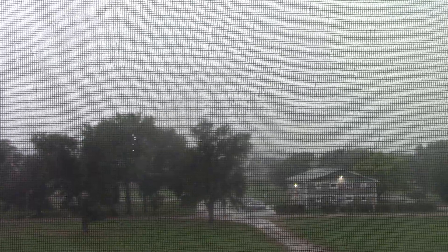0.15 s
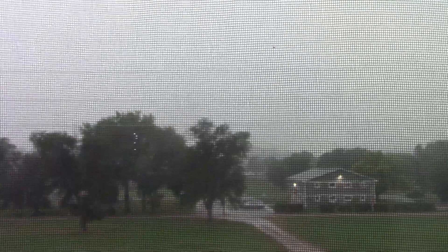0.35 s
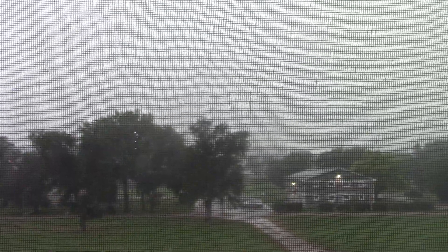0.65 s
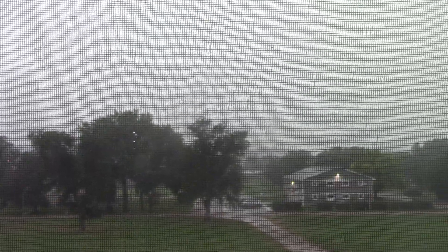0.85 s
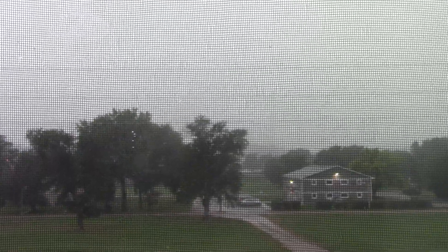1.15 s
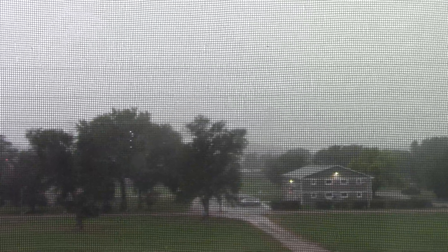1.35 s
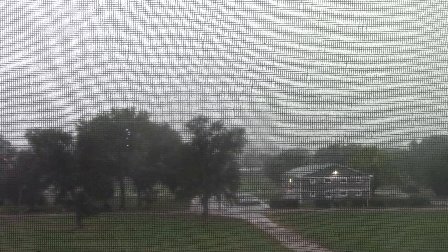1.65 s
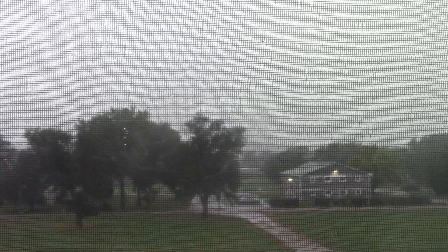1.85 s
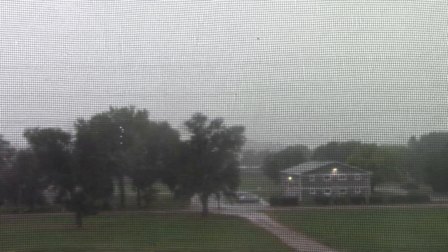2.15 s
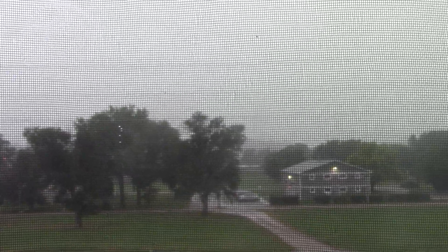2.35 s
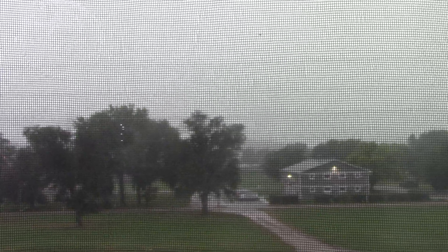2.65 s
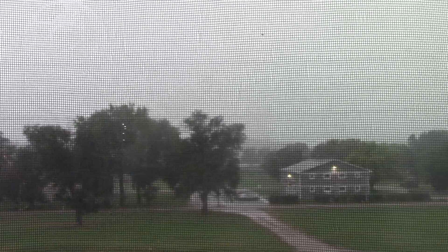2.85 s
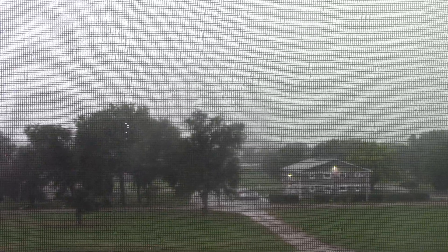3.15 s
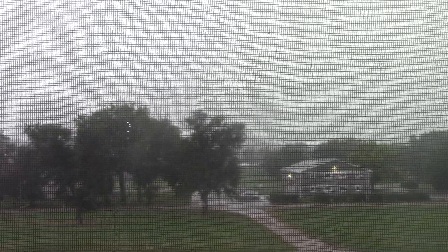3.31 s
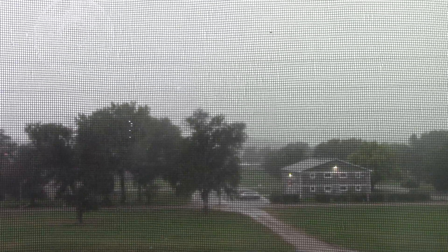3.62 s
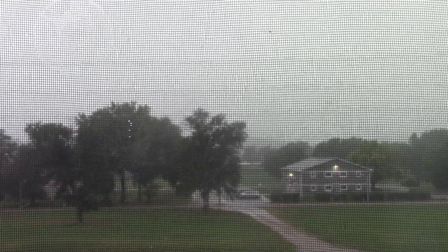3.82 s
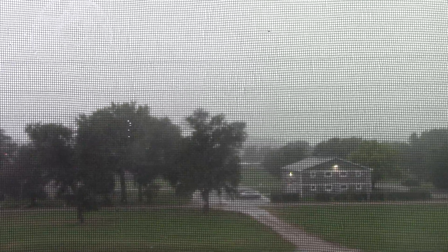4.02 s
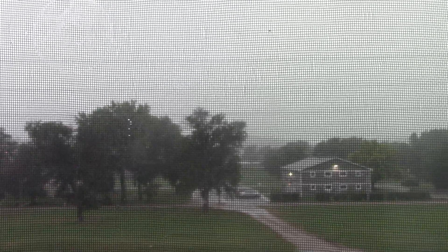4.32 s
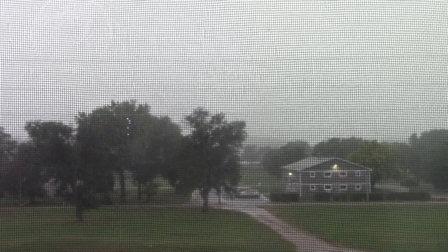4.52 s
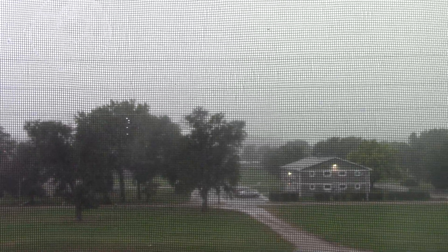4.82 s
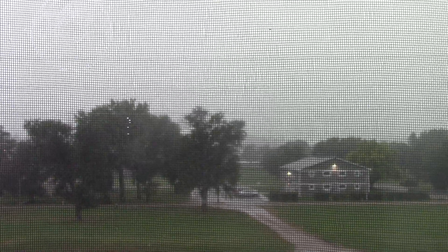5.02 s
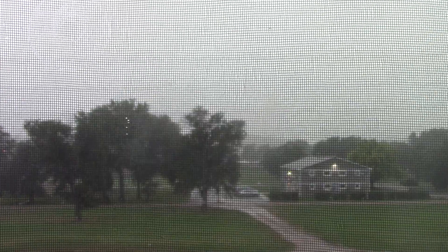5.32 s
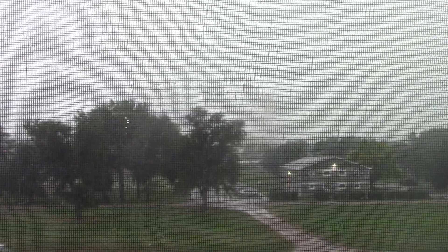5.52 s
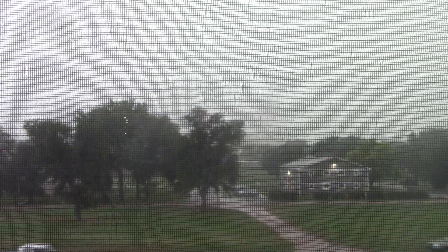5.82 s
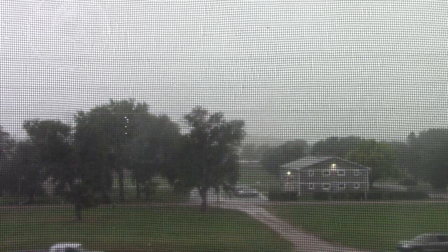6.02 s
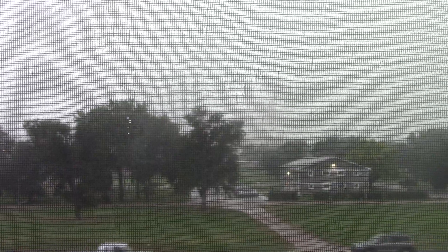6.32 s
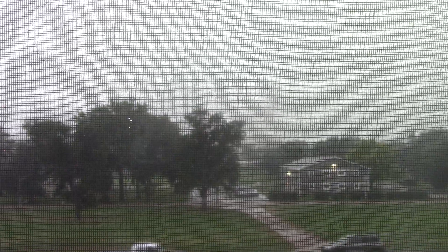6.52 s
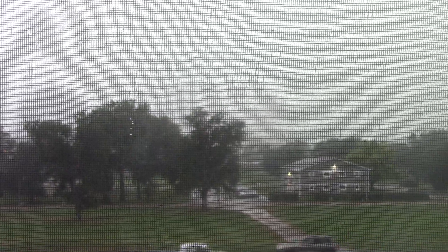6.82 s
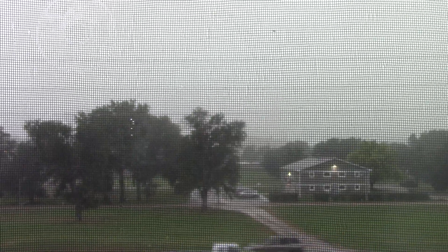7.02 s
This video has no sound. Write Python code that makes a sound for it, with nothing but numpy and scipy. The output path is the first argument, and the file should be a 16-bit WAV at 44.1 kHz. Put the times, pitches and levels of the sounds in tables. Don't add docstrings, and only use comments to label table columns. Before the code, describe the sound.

Inside a room at an open screened window, steady rain hisses over lawns and roofs with small drops pattering on the sill. Low thunder rolls, peaking a little after two seconds, then ebbs while cars swish by on the wet road. Near six seconds a far stronger peal booms with bunched claps, and it is still rolling at the end. Small stereo microphones stand just inside.

```python
import sys
import numpy as np
from scipy import signal
from scipy.fft import rfft, irfft, next_fast_len
from scipy.io import wavfile
from scipy.ndimage import uniform_filter1d, map_coordinates

SR = 44100
rng = np.random.default_rng(int(sys.argv[2]) if len(sys.argv) > 2 else 0)


def dump(signal):
    limited = np.clip(np.atleast_2d(signal).T, -1, 1)
    pcm = np.round(limited * 32767).astype(np.int16)
    wavfile.write(sys.argv[1], SR, pcm)


def to_linear_factor(level_db):
    exponent = np.asarray(level_db, float) / 20
    return 10 ** exponent


N = 315756


def unit(x):
    return x / np.sqrt(np.mean(x ** 2) + 1e-20)


def along(points, hz):
    f, v = np.transpose(points)
    return np.interp(np.log(hz + 1), np.log(f + 1), v)


def curves(rows):
    s, *cols = np.transpose(rows)
    return np.array([np.interp(np.arange(N) / SR, s, c) for c in cols])


def wobble(rate):
    knots = rng.standard_normal(int(N * rate / SR) + 4)
    return map_coordinates(knots, [np.arange(N) * rate / SR])


def filtered(x, response):
    m = next_fast_len(N + SR)
    return irfft(rfft(x, m) * response(np.fft.rfftfreq(m, 1 / SR)), m)[..., :N]


def resonance(f, hz, width):
    return 1j * f * width / (hz * hz - f * f + 1j * f * width)


def rush(spectrum, patchy_db):
    z = signal.stft(rng.standard_normal(N), nperseg=512)[2]
    field = uniform_filter1d(rng.standard_normal(z.shape), 6, 0)
    field = unit(uniform_filter1d(field, 14, 1))
    noise = signal.istft(z * to_linear_factor(patchy_db * field), nperseg=512)[1][:N]
    return unit(filtered(noise, lambda f: to_linear_factor(along(spectrum, f))))


ROLL_EDGES_HZ = [108.5, 141, 218, 311, 508]
# start_s, level_db
FAR_STROKE = [(0, -62.5), (.6, -57), (1.0, -55), (1.3, -47), (2.05, -46.5), (2.35, -39), (2.75, -45),
              (3.0, -46.5), (3.7, -52), (4.45, -51.5), (5.4, -49.5), (7.16, -68)]
# start_s, level_db
NEAR_STROKE = [
    (3.7, -61),
    (4.75, -46.5),
    (5.25, -50.5),
    (5.5, -39),
    (5.7, -31.5),
    (6.3, -36),
    (6.55, -36.5),
    (6.95, -35.5),
    (7.16, -31),
]
FAR_VOICE = [-4, -1.5, 2, -3, -3, -8]
NEAR_VOICE = [-6.5, -1.5, 2, -6, -8, -18]
# centre_s, depth_db, pitch_hz, half_length_s
LULLS = [(.3, -17, 700, .05), (.33, -8, 250, .02), (.49, -10, 180, .03), (1.01, -10, 125, .04),
         (1.11, -6, 75, 0.09), (1.43, -7, 220, 0.049), (1.44, -8, 75, .08), (1.54, -14, 270, .03),
         (1.93, -2, 75, .06), (2.09, -25, 273, 0.057), (2.31, -8, 180, 0.012), (2.34, -12, 270, .03),
         (2.86, -7, 75, 0.087), (3.31, -1, 756, .05), (3.36, -9, 125, 0.027), (4.16, -11, 125, 0.045),
         (4.43, -3, 400, 0.035), (4.57, -17, 125, 0.049), (4.58, -6, 75, 0.071), (4.9, -1, 400, 0.044),
         (4.93, -29, 270, 0.041), (4.95, -15, 124, 0.062), (5.1, -14, 270, .03), (5.3, -1, 200, .04),
         (5.41, -12, 75, .1), (5.535, -9, 125, 0.027), (5.59, -2.5, 270, 0.039), (5.52, -5.5, 400, 0.043),
         (5.63, -3.5, 500, 0.06), (5.76, -3, 400, 0.024), (5.915, -2, 160, .015), (6.03, -2, 160, 0.021),
         (6.19, -3, 200, .02), (6.46, -7, 192.7, .02), (6.2, -13, 101, 0.043), (6.43, -2, 75, .07),
         (6.57, -16, 135, 0.031), (6.66, -13, 125, 0.035), (6.75, -2, 270, 0.046), (6.8, -1, 760, 0.039),
         (6.83, -9, 150, .03), (5.99, -4.5, 790, .02), (6.95, -10, 125, .03), (6.98, -2, 251, 0.015)]


def roll():
    kin = [0, 0, 1, 2, 2, 3]
    fronts = rng.standard_normal((4, N))[kin] * to_linear_factor(1.4 * wobble(35))
    turns = np.c_[[1j, 1, 1, 1j, 1, 1]]

    def parts(f):
        above = [1 / (1 + (hz / (f + 1)) ** 16) for hz in ROLL_EDGES_HZ]
        above = [np.ones_like(f)] + above + [0 * f]
        return np.sqrt(np.abs(np.diff(above, axis=0)))

    rings = filtered(fronts, lambda f: parts(f) * turns * room(f))
    power = uniform_filter1d(uniform_filter1d(rings ** 2, size=2600), size=2600)
    strokes = (to_linear_factor(curves(FAR_STROKE)) * to_linear_factor(np.c_[FAR_VOICE])) ** 2
    strokes = strokes + (to_linear_factor(curves(NEAR_STROKE)) * to_linear_factor(np.c_[NEAR_VOICE])) ** 2
    surge_db = 0.9 * np.array([wobble(8.3) for _ in range(4)])
    surges = to_linear_factor(surge_db)[kin] ** 2
    gaps = to_linear_factor(bumps(LULLS, lambda db: db, lambda hz: close(hz, octaves=0.31)))
    strength = np.sqrt((strokes * surges + echoes()) / (np.abs(power) + 1e-12))
    return np.sum(gaps * rings * strength, axis=0)


# start_s, peak_db, pitch_hz
FAR_CLAPS = [(0.194, -33.5, 158), (0.23, -37, 146), (0.251, -48, 169), (0.347, -58, 376), (.375, -44, 181),
             (0.499, -42, 377), (0.632, -41, 150), (0.824, -47, 195), (0.86, -54, 140), (1.081, -44.5, 377),
             (1.331, -33, 141), (1.356, -50, 170), (1.488, -29.5, 180), (1.62, -44, 358), (1.751, -49, 401),
             (1.911, -31, 136), (2.261, -20.5, 172), (2.286, -24, 149), (2.358, -32, 135),
             (2.375, -37, 348), (2.53, -33, 412), (2.55, -29, 183), (2.677, -31, 134), (3.198, -30.5, 208),
             (3.431, -56, 136), (3.472, -31, 133), (3.827, -34, 182), (3.9, -32.5, 183), (4.041, -35, 177),
             (4.362, -52, 137), (4.529, -38.5, 387)]
NEAR_CLAPS = [(5.39, -29, 208), (5.544, -23.5, 185), (5.568, -22, 194), (5.627, -16.5, 200),
              (5.693, -26.5, 274.5), (5.72, -22.5, 267), (5.811, -6, 184), (5.834, -18, 175),
              (5.857, -12, 176), (5.926, -21, 277), (5.966, -27, 412), (6.044, -10.5, 201.5),
              (6.052, -30, 412), (6.072, -16.5, 200), (6.101, -12.5, 176), (6.16, -23, 274),
              (6.2, -26, 255), (6.282, -17.5, 151), (6.302, -30, 150), (6.567, -20.5, 282),
              (6.586, -29, 243), (6.752, -41, 705), (6.86, -11, 176), (6.887, -15, 177), (6.908, -26, 178),
              (7.021, -23.5, 289), (7.034, -17.5, 221), (7.061, -21.5, 141), (7.094, -27, 444),
              (7.125, -22, 135)]


def claps():
    push, t = np.zeros(N + SR), np.arange(SR // 5) / SR
    for s, db, hz in FAR_CLAPS + NEAR_CLAPS:
        length_ms = 11.2 * (hz / 200) ** 0.89
        u = 1000 * t / length_ms
        envelope = np.e * u * np.exp(-u * (1 + u) / 2) / 2
        push[round(s * SR):][:len(t)] += to_linear_factor(db) * envelope * np.sin(2 * np.pi * hz * t)

    def direct(f):
        ratio = 112 / (f + 1)
        return 0.8 / (1 - ratio ** 2 - 1.2j * ratio) ** 2

    return filtered(push[:N], lambda f: direct(f) + 2.99 * room(f))


# peak_s, level_db, pitch_hz,
# half_length_s
SWELLS = [(0.223, -54, 276, 0.018), (0.5, -48, 363, 0.024), (0.586, -58, 760, 0.092),
          (0.667, -45.5, 140, 0.035), (.83, -54, 760, 0.065), (.88, -45.5, 151, 0.066),
          (1.262, -53.5, 760, 0.2), (1.7, -53, 300, 0.08), (1.928, -43, 125, 0.062), (2.267, -39, 162, .05),
          (2.386, -35, 126, 0.044), (2.38, -68, 760, 0.11), (2.523, -43, 370, 0.11),
          (2.94, -45, 198, 0.073), (3.222, -44.5, 314, 0.036), (1.324, -43, 135, 0.032),
          (3.456, -40, 134, 0.036), (4.37, -38.5, 125, 0.027), (5.625, -39.5, 193, 0.094),
          (4.793, -44, 183, 0.14), (4.973, -51.5, 760, 0.039), (5.11, -38.5, 174, 0.038),
          (5.75, -48.5, 760, 0.029), (5.843, -27, 128, 0.054), (.12, -54.5, 310, 0.024),
          (.69, -50, 110, .03), (2.24, -39, 125, .03), (2.45, -54, 700, .04), (2.94, -40, 125, 0.033),
          (3.5, -51, 125, .025), (3.63, -47, 125, 0.034), (3.69, -56.5, 700, 0.023), (4.04, -50, 180, .025),
          (4.86, -50, 125, .025), (6.86, -39, 270, 0.021), (7.04, -27, 125, 0.019),
          (7.13, -48.5, 850, 0.041), (5.7, -40, 75, .1), (5.87, -30, 75, 0.052), (5.995, -43, 760, 0.048),
          (6.23, -45.5, 760, 0.14), (6.294, -31.5, 123, 0.12), (6.354, -36.5, 332, 0.08),
          (6.763, -32.5, 156, 0.016), (7.064, -53, 760, 0.031),
          (0.384, -49, 125, .03), (0.37, -54, 700, 0.022), (0.634, -50, 270, 0.017),
                (0.85, -52, 318, 0.062), (1.35, -45, 400, 0.024), (1.403, -53, 760, 0.0092),
                (1.62, -47, 75, .05), (1.677, -49, 161, 0.055), (1.65, -56, 760, 0.047),
                (1.75, -55, 75, 0.044), (1.743, -52, 760, 0.02), (1.89, -53.5, 760, .04),
                (2.013, -56, 400, 0.025), (2.172, -58, 75, 0.046), (2.4, -54, 720, 0.2),
                (2.662, -35, 190, 0.012), (2.685, -57, 75, .05), (2.986, -46, 340, 0.031),
                (3.21, -50, 75, 0.065), (3.7, -46, 125, 0.028), (3.69, -52, 400, 0.034),
                (3.86, -44.5, 109, 0.047), (3.972, -47, 125, 0.027), (4.024, -50, 270, 0.02),
                (4.248, -44.5, 196, 0.027), (4.26, -48, 330, 0.031), (4.67, -43, 125, 0.022),
                (4.743, -57, 760, 0.035), (4.842, -47.5, 270, .03), (4.944, -40.5, 184, 0.056),
                (5.07, -60, 75, .05), (5.27, -43, 125, 0.036), (5.35, -47, 400, 0.034),
                (5.43, -42, 125, .025), (5.494, -46, 268, 0.027), (5.735, -32.5, 186, 0.034),
                (5.93, -39.5, 412, 0.028), (6.14, -32, 125, 0.037), (6.268, -34, 270, 0.015),
                (6.576, -53, 850, 0.056), (6.898, -37.5, 396, 0.033), (6.94, -45, 75, 0.065),
                (7.013, -43, 125, .03), (7.04, -50, 760, 0.009)]


def echoes():
    power, t = np.zeros((len(ROLL_CENTRES_HZ), N + SR)), np.arange(SR // 2) / SR
    echo_db, t60_s, octaves = -12, 0.26, 0.38

    def share(hz):
        return close(hz, octaves) / np.sum(close(hz, octaves))

    for s, db, hz in FAR_CLAPS + NEAR_CLAPS:
        tail = to_linear_factor(db + echo_db - 60 * t / t60_s) ** 2 * (1 - np.exp(-t / 0.0089))
        power[:, round(s * SR):][:, :len(t)] += np.outer(share(hz), tail)
    return power[:, :N] + bumps(SWELLS, lambda db: to_linear_factor(db) ** 2, share)


def bumps(rows, strength, reach):
    out, clock = np.zeros((len(ROLL_CENTRES_HZ), N)), np.arange(N) / SR
    front = 0.92
    for s, db, hz, half in rows:
        near = slice(max(0, int((s - 4 * half) * SR)), int((s + 4 * half) * SR))
        late = clock[near] - s
        u = late / (half * np.where(late < 0, front, 2 - front))
        out[:, near] += np.outer(reach(hz) * strength(db), np.exp(-u ** 2))
    return out


ROLL_CENTRES_HZ = [75, 125, 180, 270, 400, 760]


def close(hz, octaves):
    return np.exp(-(np.log2(hz / np.array(ROLL_CENTRES_HZ)) / octaves) ** 2)


# peak_s, level_db, pitch_hz, half_length_s
SINGING = [(0.05, -68, 1000, 0.021), (0.249, -43.5, 172, 0.019), (1.182, -50.5, 710, 0.052),
           (1.262, -52, 780, 0.022), (1.312, -54, 888, 0.02), (1.412, -54, 795, 0.02),
           (1.606, -51, 750, 0.022), (1.631, -46.5, 445, 0.026), (1.676, -53, 760, 0.022),
           (1.741, -54, 807, 0.024), (1.766, -50, 431, 0.022), (1.861, -57, 549, 0.027),
           (1.921, -49, 377, 0.024), (1.936, -54, 426, 0.106), (2.205, -46, 705, 0.032),
           (2.38, -43.5, 711, 0.04), (2.38, -36.5, 359, 0.044), (2.819, -47, 436, 0.022),
           (2.928, -46, 371, 0.062), (3.123, -44, 425, 0.024), (3.228, -50, 415, 0.026),
           (3.482, -41, 127, 0.046), (3.682, -59, 700, 0.026), (3.851, -48, 394, 0.031),
           (4.37, -51.5, 514, 0.022), (4.734, -52, 705, 0.045), (4.744, -53, 553, 0.026),
           (4.784, -44.5, 360, 0.022), (4.834, -52, 867, 0.026), (4.979, -51, 880, 0.026),
           (5.128, -46.5, 377, 0.039), (5.428, -36, 145, 0.036), (5.572, -25, 186, 0.028),
           (6.071, -31, 423, 0.027), (6.246, -47, 776, 0.036), (6.296, -28.5, 176, 0.02),
           (6.356, -38, 370, 0.02), (6.595, -38.5, 414.8, 0.066), (6.765, -39, 415, 0.026),
           (6.775, -32, 177, 0.04), (6.914, -36.5, 382, 0.018), (7.099, -38, 467, 0.032)]


def singing():
    out, waver = np.zeros(N + SR), 1.17 * wobble(18)
    for s, db, hz, half in SINGING:
        t = np.arange(-2 * half, 3 * half, 1 / SR)
        start = max(0, round((s + t[0]) * SR))
        swell = np.exp(-(t / (half * np.where(t < 0, .85, 1.15))) ** 2)
        phase = 2 * np.pi * hz * t + np.resize(waver[start:], len(t))
        out[start:][:len(t)] += to_linear_factor(db) * swell * np.sin(phase)
    return out[:N]


# pitch_hz, width_hz, level_db
ROOM_MODES = [(72, 24, -43.5), (90, 27, -29), (121.4, 9.8, -9.5), (134.7, 15, -0.5), (176, 12.3, -2),
              (211.5, 11, -6.5), (249.7, 48, -9.5), (291.6, 16, -10), (352.4, 10.2, -5), (377, 15.7, -4),
              (412, 7.1, -1.5), (444, 33, -20), (529, 25, -18), (561, 9.1, -16), (648, 20, -19),
              (705, 14, -11.5), (720, 65, -19), (785, 36, -12), (873, 30, -16), (899, 28, -17.5),
              (980, 27, -34)]
# pitch_hz, level_db
DIFFUSE = [(25, -51), (40, -39), (51, -45), (63, -31), (104, -34), (125, -26), (300, -18), (480, -25),
           (620, -29), (800, -23), (1200, -36), (2000, -56), (4000, -110)]


def room(f):
    modes = sum(to_linear_factor(db) * resonance(f, hz, width) for hz, width, db in ROOM_MODES)
    modes = modes + to_linear_factor(along(DIFFUSE, f))
    modes = modes * (1 - 1.0 * resonance(f, 47, 10)) * (1 - 0.64 * resonance(f, 101.5, 22))
    return modes / (1 - (f / 1000) ** 2 + 1.3j * f / 1000) ** 3


# pitch_hz, width_hz, gain_db
BAY = [(1500, 85, 2), (1750, 57, -0.5), (2170, 60, 1.5), (2280, 113, 4), (3760, 120, 1.5), (4350, 210, 0.5)]


def outdoors():
    def bay(f):
        return 1 + sum((to_linear_factor(db) - 1) * resonance(f, hz, width) for hz, width, db in BAY)

    return filtered(rain() + drops() + filtered(tyre_spray(), flutter), bay)


# pitch_hz, density_db_per_hz
RAIN = [(650, -25), (1100, 0.5), (1400, -5), (1480, -4), (1960, -6), (2140, -5), (2310, -16.5),
        (2760, -7.5), (3190, -10.5), (3410, -14.5), (4350, -13), (5800, -14.5), (14200, -27.5),
        (15900, -34)]
# pitch_hz, density_db_per_hz
ROOF = [(25, -31), (53, -32), (90, -3.5), (144, -4), (333, -10.5), (393, -7), (658, -16), (889, -11.5),
        (1300, -32), (1690, -55), (2860, -120)]


def rain():
    rain_db = -63 + 0.2842 * np.arange(N) / SR
    hiss = to_linear_factor(rain_db + 0.3 * wobble(2.6)) * rush(RAIN, patchy_db=0.6)
    return hiss + to_linear_factor(-55 + 1.8 * wobble(5.05)) * rush(ROOF, patchy_db=1.0)


# pitch_hz, density_db_per_hz
FAR_SPRAY = [(700, -14), (1100, -15.5), (1500, 1.5), (2300, 0.5), (2700, -4.5), (3600, -4), (4500, -6),
             (6000, -14.5), (8000, -34.5), (12000, -102)]
# pitch_hz, density_db_per_hz
NEAR_SPRAY = [(3000, -31), (3500, 0), (3700, 2), (3950, -10), (4200, -14), (4450, 6), (4700, -20),
              (5300, -21), (7000, -50)]


def tyre_spray():
    far, near = passing()
    spray = far * to_linear_factor(.9 * wobble(14)) * rush(FAR_SPRAY, patchy_db=.7)
    return spray + near * to_linear_factor(.8 * wobble(7)) * rush(NEAR_SPRAY, patchy_db=1.6)


# closest_s, far_spray_db, near_spray_db, passing_time_s
CARS = [
    (-2.5, -67, -100, 2.2),
    (3.5, -63.5, -86, 1.11),
    (5.5, -62, -80, 0.9),
    (7.5, -65.5, -71.5, 1.4),
]


def passing():
    t, power = np.arange(N) / SR, np.zeros((2, N))
    for s, far_db, near_db, span in CARS:
        power += np.outer(to_linear_factor([far_db, near_db]) ** 2, 1 / (1 + ((t - s) / span) ** 2))
    return np.sqrt(power)


# round_trip_ms, share_returned
FLUTTER = [(24.0, 0.23), (17.34, 0.45), (9.21, 0.17)]


def flutter(f):
    comb = 1
    for ms, share in FLUTTER:
        back = share / (1 + (f / 4000) ** 2)
        comb = comb / (1 - back * np.exp(-2j * np.pi * f * ms / 1000))
    return comb


# start_s, peak_db, pitch_hz, t60_s
DROPS = [(.195, -49, 2780, 0.032), (.195, -50, 1590, 0.034), (.197, -56.5, 3460, 0.038),
         (.303, -52, 2800, 0.034), (0.641, -54, 1500, 0.1), (0.702, -51, 2760, .04),
         (0.766, -50, 3930, 0.036), (0.766, -53, 3200, 0.034), (.809, -53, 4500, 0.027),
         (.869, -58, 4700, .03), (.931, -56, 4150, 0.033), (1.911, -48, 1440, 0.053),
         (3.678, -48, 2000, 0.034), (3.94, -55, 2110, .03), (3.958, -49, 4340, .04), (5.43, -58, 2280, 0.1),
         (5.505, -47, 2100, .03), (5.545, -47, 3700, 0.03), (5.54, -50, 2980, 0.036),
         (6.31, -42, 1890, 0.037), (6.513, -44, 3650, 0.021), (6.513, -56, 4740, 0.025)]


def drops():
    out, t = np.zeros(N + SR), np.arange(SR // 5) / SR
    for s, db, hz, t60 in DROPS:
        waver = 2.8 * np.cumsum(rng.standard_normal(len(t))) / np.sqrt(SR / 100)
        noise = uniform_filter1d(uniform_filter1d(rng.standard_normal(len(t)), size=5), size=4)
        splash = .4 * to_linear_factor(-60 * t / 0.029) * noise
        ring = to_linear_factor(-60 * t / t60) * np.sin(2 * np.pi * hz * t + waver)
        out[round(s * SR):][:len(t)] += to_linear_factor(db + 1.0) * (1 - np.exp(-t / 0.0034)) * (ring + splash)
    return filtered(out[:N], lambda f: 1 / (1 + (f / 5500) ** 8))


# start_s, peak_db
KNOCK = (.817, -50)
# pitch_hz, level_db, t60_s
FRAME = [(1265, 3.5, 0.092), (1500, -6, .06), (1845, 2, 0.065), (2132, -1, .11), (2370, -8, .07),
         (2820, -7, .06), (3090, -6, .07), (3650, -11, .07)]


def knock():
    out, t = np.zeros(N), np.arange(SR // 5) / SR
    start_s, peak_db = KNOCK
    ring = sum(to_linear_factor(db - 60 * t / t60) * np.sin(2 * np.pi * hz * t) for hz, db, t60 in FRAME)
    band = signal.butter(2, [2200 / SR, 7000 / SR], "band")
    ring += 1.5 * to_linear_factor(-60 * t / .09) * signal.lfilter(*band, rng.standard_normal(len(t)))
    out[round(start_s * SR):][:len(t)] = to_linear_factor(peak_db) * (1 - np.exp(-t / 0.003)) * ring
    return out


# pitch_hz, density_db_per_hz
PATTER = [(600, -40), (1100, 3.5), (2200, -2), (4400, -7), (6500, -16), (9000, -59)]


def patter():
    per_s, level_db, spread_db, decay_ms = 70, -71.5, 4.5, 7
    sizes = to_linear_factor(spread_db * np.minimum(rng.exponential(size=N), 2))
    hits = uniform_filter1d((rng.random(N) < per_s / SR) * sizes, size=90)
    splashes = signal.lfilter([1], [1, -np.exp(-1000 / (decay_ms * SR))], hits)
    return to_linear_factor(level_db) * unit(splashes) * rush(PATTER, patchy_db=2.5)


# pitch_hz, density_db_per_hz
CAPSULES = [(88, -40.5), (150, -15), (187, -8), (349, 0.5), (638, -2.5), (726, -2), (956, -6), (2220, -11),
            (2820, -11.5), (6500, -21.5), (9500, -29.5), (12000, -30.5), (13000, -36), (15600, -57.5),
            (22000, -120)]


def capsules():
    return to_linear_factor(-50.5 - 16.5) * rush(CAPSULES, patchy_db=-0.7)


# pitch_hz, level_db
WHINE = (5561, -84.5)


def whine():
    hz, db = WHINE
    level = to_linear_factor(db + .8 * wobble(4.5)) * np.sqrt(2)
    return level * np.sin(2 * np.pi * hz * np.arange(N) / SR + 1.1 * wobble(25))


# pitch_hz, density_db_per_hz
HOUSE = [(15, -29), (28, -14), (40, 1), (52, -11), (70, -12), (120, -49.5)]
# pitch_hz, density_db_per_hz
PREAMP = [(10, -29), (20, -1), (70, 2), (110, -5), (200, -39)]


def own_noise():
    house = to_linear_factor(-81) * rush(HOUSE, patchy_db=3.0)
    return house + to_linear_factor(-89) * rush(PREAMP, patchy_db=1.1) * [[1], [-1]]


# pitch_hz, difference_db
LEAN = [(300, 1), (1000, 0.5), (4000, 1.9), (9000, 0.2), (14000, -0.5)]


def scene():
    thunder = roll() + claps() + singing()
    street = filtered(outdoors(), lambda f: to_linear_factor(np.outer([.5, -.5], along(LEAN, f))))
    sill = patter() * to_linear_factor([[.5], [-.5]]) + knock()
    side = capsules() + to_linear_factor(-51.5) * np.roll(thunder, 150)
    return thunder + street + sill + [side + whine(), -side]


def top_cut(x):
    return signal.sosfilt(signal.butter(12, 15760, fs=SR, output="sos"), x)


def record(dry):
    def microphone(f):
        return (1j * f / (60 + 1j * f)) ** 3

    ends = np.minimum(1, np.arange(N)[::-1] / 220)
    return top_cut(ends * (filtered(dry, microphone) + own_noise()))


dry = scene()
out = record(dry)
dump(out)
```